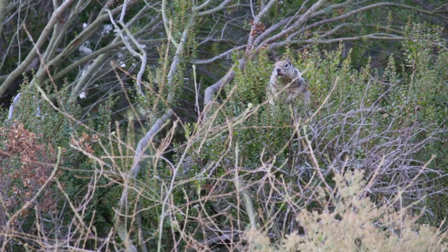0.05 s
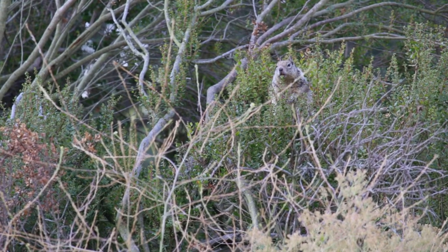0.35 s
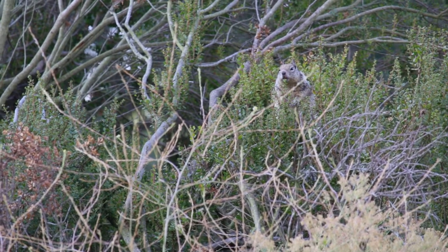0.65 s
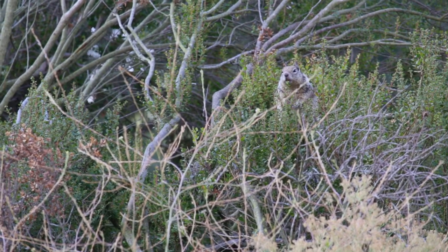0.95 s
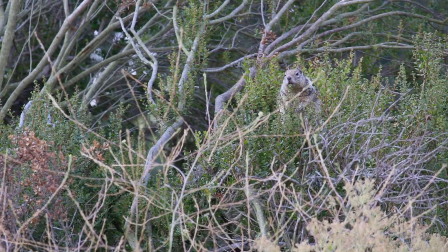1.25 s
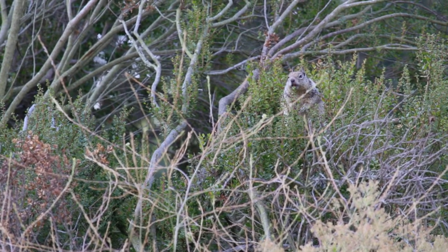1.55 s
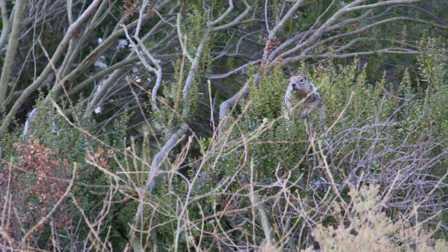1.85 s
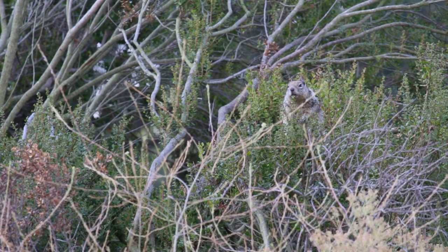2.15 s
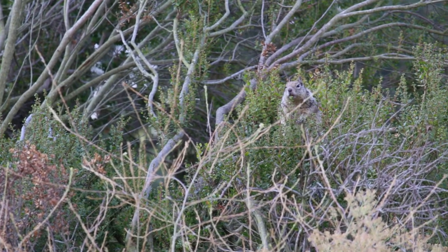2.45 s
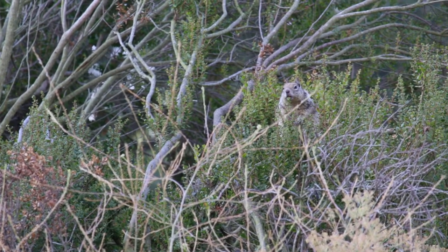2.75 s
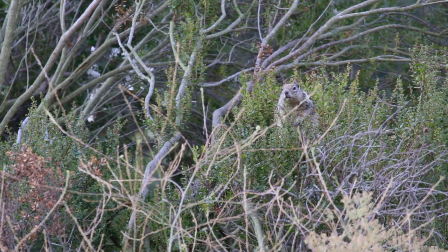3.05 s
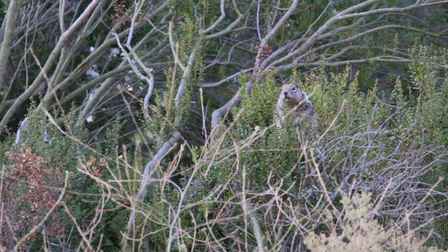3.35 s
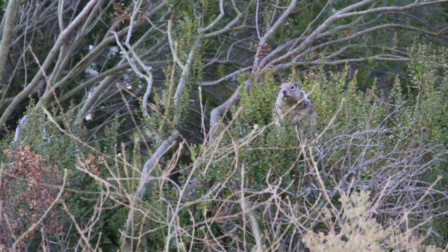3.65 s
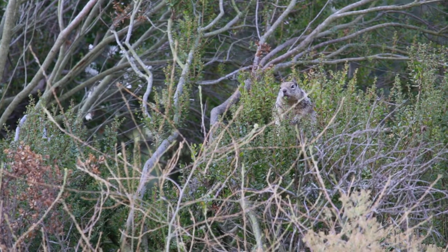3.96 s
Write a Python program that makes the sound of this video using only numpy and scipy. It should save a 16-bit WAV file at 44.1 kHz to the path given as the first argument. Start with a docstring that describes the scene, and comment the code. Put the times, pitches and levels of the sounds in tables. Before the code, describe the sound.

Outdoors among shrubs, faint birds chirp over a distant low rumble and light hiss. A ground squirrel lets out one loud, whistled alarm chirp, followed by a soft nasal bird mew and more far-off chirps and whistles.

```python
"""A distant low rumble runs throughout, swelling like a far aircraft, with a hollow, slowly sliding
resonance in it, over a faint hiss. Small birds chirp further off from the start, in short glides.
At 0.4 s a far, level whistle sounds. At 1.4 s a ground squirrel on a shrub gives one sharp whistled
alarm chirp, which scatters back from the brush. At 1.8 s a bird gives a nasal mew, its harmonics
sliding through a throat resonance. The far whistle returns at 1.9 and 3.5 s."""
import sys
import numpy as np
from scipy import signal
from scipy.fft import rfft, irfft
from scipy.io import wavfile

SR = 44100
rng = np.random.default_rng(int(sys.argv[2]) if len(sys.argv) > 2 else 0)


def int16_out(signal):
    """Quantize to a 16-bit WAV file."""
    q = np.round(np.clip(np.atleast_2d(signal).T, -1, 1) * 32767)
    wavfile.write(sys.argv[1], SR, q.astype(np.int16))


N = 176400

# rumble and hiss spectra: f/Hz, relative density/dB
RUMBLE_SPECTRUM = [(22, -16), (40, -8), (55, -2.5), (72, 2.5), (88, -1), (112, 1.2), (135, -3.5), (158, -8),
                   (190, -1), (225, 0), (270, -2), (330, -5), (420, -9.5), (580, -11.5), (690, -15),
                   (800, -21), (1000, -18.5), (1200, -28.5), (1410, -28.5), (1650, -32.5), (2000, -37),
                   (2800, -43)]
HISS_SPECTRUM = [(1650, -31), (2800, -2.5), (3370, 1), (3920, -2.5), (6380, -5), (10300, -8),
                 (15500, -13.5)]
# rumble swells in four ranges, low to high: t/s, relative level/dB
DEEP_SWELL = [(0, -46), (.15, -38), (.24, -38), (.36, -43.5), (.8, -41), (1.2, -42.5), (1.6, -41.5),
              (2.1, -42), (2.6, -37.5), (3.2, -41.5), (3.6, -41.5), (4, -38)]
LOW_SWELL = [(0, -46.5), (.4, -45.5), (.8, -40.5), (1.3, -40.5), (2.2, -40), (2.7, -35), (3.1, -37.5),
             (3.5, -35), (4, -39)]
BODY_SWELL = [(0, -35.5), (.4, -37.5), (1.0, -35), (1.6, -35), (2.1, -36), (2.35, -35), (2.41, -31.5),
              (2.46, -36.5), (3.0, -31), (3.4, -31.5), (3.7, -33), (4, -36.5)]
RUSH_SWELL = [(0, -43), (.8, -44.5), (1.3, -38.5), (1.72, -39.5), (1.9, -44), (2.4, -41), (2.85, -38.5),
              (3.2, -43), (3.65, -41), (4, -42)]
# top edge of each range: f/Hz
SWELL_TOPS_HZ = [88, 150, 390, 850]
# stereo width of rumble and hiss: f/Hz, side minus mid/dB
NOISE_WIDTH = [(60, -34), (130, -35.5), (290, -23), (640, -18.5), (1410, -10), (3100, 1.5), (6800, 1),
               (15000, -.5)]
# hollow resonance in the rumble: t/s, centre f/Hz, level/dB
RESONANCE_CONTOUR = [(0, 290, -40.5), (.4, 280, -43), (.82, 310, -41.5), (.86, 320, -29), (.93, 310, -42.5),
                     (1.15, 360, -47.5), (1.4, 345, -34), (1.6, 310, -35.5), (1.8, 280, -35),
                     (2.05, 290, -41.5), (3.15, 260, -42.5), (3.42, 255, -30), (3.55, 260, -35.5),
                     (4, 240, -44)]
# hiss: t/s, level/dB
HISS_ENVELOPE = [(0, -63.5), (.6, -64.5), (1.3, -64), (4, -64.5)]
# small birds: t/s, length/s, start f/Hz, middle f/Hz, end f/Hz, level/dB, echo/dB
BIRD_CHIRPS = [(0.059, 0.039, 3950, 4190, 4070, -52.5, -14), (0.2, .055, 3850, 4350, 4740, -59.5, -5),
               (0.324, 0.055, 4060, 4410, 4600, -56, -6), (0.449, .055, 3920, 4250, 4800, -58, -6),
               (.680, .065, 2870, 2980, 3000, -65, -6), (.945, 0.026, 3870, 3450, 3050, -64, -10),
               (1.634, 0.019, 3750, 3800, 3720, -59, -14), (1.937, 0.045, 8420, 7950, 7300, -51.5, -4),
               (2.066, 0.06, 7630, 7210, 7000, -52, -4.5), (2.180, .060, 7240, 6700, 6300, -65, 3),
               (2.218, .018, 6600, 5600, 4600, -57, -6), (2.31, .050, 6900, 6400, 5900, -68, 2),
               (2.680, .035, 3880, 3400, 3050, -64, -8)]
# far whistle: t/s, length/s, level/dB
WHISTLE_NOTES = [(0.393, 0.16, -60), (1.933, .15, -59.5), (3.533, 0.153, -58)]
# its harmonics 1-3: gain/dB
WHISTLE_PARTIALS_DB = [-27, 3, -13.5]
# squirrel's pitch: t/s, f/Hz
ALARM_CONTOUR = [(1.434, 3470), (1.444, 3484), (1.454, 3512), (1.466, 3541), (1.474, 3420), (1.486, 3400)]
# its harmonics 1-4: gain/dB, left minus right/dB, echo/dB
ALARM_PARTIALS = [(1, -3.5, 2), (-18.5, 2.5, 5), (-18.5, -1.5, 7), (-35, -2.5, 0)]
# mew: t/s, f/Hz, level/dB
MEW_CONTOUR = [(1.815, 586, -76), (1.835, 625, -61), (1.850, 747, -59), (1.860, 800, -52),
               (1.874, 900, -51), (1.881, 807, -53), (1.895, 710, -71)]
# its throat resonance: f/Hz, gain/dB
THROAT_RESPONSE = [(1500, -28), (2400, -12), (3200, -0.5), (3800, 0), (4400, 1.5), (4800, -24), (5600, -24)]


def from_db(db):
    """Decibels to gain."""
    return 10 ** (np.asarray(db) / 20)


def unit_rms(x):
    """Scale to rms 1."""
    return x / np.sqrt(np.mean(x ** 2) + 1e-20)


TIME_S = np.arange(N) / SR


def in_time(rows):
    """Each column of a curve at every sample."""
    times_s, *columns = np.transpose(rows)
    return [np.interp(TIME_S, times_s, column) for column in columns]


def at_hz(spectrum, hz):
    """Read a spectrum on a log-frequency axis."""
    points_hz, db = np.transpose(spectrum)
    return np.interp(np.log(hz), np.log(points_hz), db)


def drift(rate_hz):
    """Low-passed noise, rms 1."""
    pole = np.exp(-2 * np.pi * rate_hz / SR)
    return unit_rms(signal.lfilter([1], [1, -2 * pole, pole * pole], rng.standard_normal(N + SR))[SR:])


def butter(x, order, hz, kind):
    """Butterworth filter."""
    return signal.sosfilt(signal.butter(order, hz, kind, fs=SR, output="sos"), x)


def phase_of(hz):
    """Running phase of a pitch curve."""
    return 2 * np.pi * np.cumsum(hz) / SR


def voice(hz, harmonics_db):
    """Harmonics on a pitch curve, each of rms 1 at 0 dB."""
    phase = phase_of(hz)
    return np.sqrt(2) * sum(from_db(db) * np.sin(k * phase) for k, db in enumerate(harmonics_db, 1))


def pan(db):
    """Stereo gains for a left minus right level."""
    return from_db(np.array([[db], [-db]]) / 2)


def placed(x, pan_db, left_lead_s):
    """Direction as level and time differences between the ears."""
    left, right = np.broadcast_to(x, (2, N))
    delay = np.exp(-1j * np.pi * np.arange(N + 1) * SR / N * left_lead_s)
    return pan(pan_db) * np.array([left, irfft(rfft(right, 2 * N) * delay)[:N]])


def scatter(x, t60_s, loss_db_per_s=0, shared=0.2, build_s=0.0036):
    """Dense echoes from twigs and ground, partly shared by both ears."""
    t = TIME_S[:SR]
    decay = from_db(-60 * t / t60_s) * (1 - np.exp(-t / build_s))
    echoes = np.sqrt(shared) * rng.standard_normal(SR)
    echoes = echoes + np.sqrt(1 - shared) * rng.standard_normal((2, SR))
    echoes *= decay / np.linalg.norm(decay) * from_db(-loss_db_per_s * t)
    return signal.fftconvolve(x[None], echoes, axes=1)[:, :N]


def noise_bands(spectrum, edges_hz):
    """Yield centre Hz and stereo noise for each band."""
    white = rng.standard_normal((2, 2, N + SR // 2))
    for k, (low, high) in enumerate(zip(edges_hz, edges_hz[1:])):
        mid, side = butter(white[k % 2], 3, [low, high], "band")[:, -N:]
        hz = np.sqrt(low * high)
        stereo = mid + from_db(at_hz(NOISE_WIDTH, hz)) * side * [[1], [-1]]
        yield hz, from_db(at_hz(spectrum, hz)) * stereo


def distant_rumble(noise_db=-31, patchy_db=0.33, low_cut_hz=37):
    """Low noise swelling separately in four ranges under an even top, plus its resonance."""
    curves = (DEEP_SWELL, LOW_SWELL, BODY_SWELL, RUSH_SWELL)
    swells_db = [db - db.mean() for curve in curves for db in in_time(curve)] + [0]
    noise = 0
    for hz, band in noise_bands(RUMBLE_SPECTRUM, np.geomspace(22, 2800, 29)):
        lean_right = pan(-1.1 * min(hz / 1000, 1))
        swell_db = swells_db[np.searchsorted(SWELL_TOPS_HZ, hz)]
        noise += lean_right * band * from_db(swell_db + patchy_db * drift(7.3))
    noise = from_db(noise_db) * unit_rms(butter(noise, 2, low_cut_hz, "high"))
    return placed(noise + hollow_resonance(), pan_db=-0.2, left_lead_s=-70e-6)


def hollow_resonance(width_hz=28, hum_ratio=0.8):
    """A hum in a narrow noise band with a slowly sliding centre."""
    hz, db = in_time(RESONANCE_CONTOUR)
    phase = phase_of(hz)
    in_phase = (np.sqrt(2) * hum_ratio + drift(width_hz)) * np.cos(phase)
    quadrature = drift(width_hz) * np.sin(phase)
    return from_db(db) * unit_rms(in_phase + quadrature)


def hiss():
    """Faint, even hiss of open air."""
    db, = in_time(HISS_ENVELOPE)
    noise = sum(band for _, band in noise_bands(HISS_SPECTRUM, np.geomspace(2800, 17000, 9)))
    return from_db(db) * noise / noise.mean(axis=0).std()


def small_birds():
    """Short gliding whistles, some nearly dry, others blurred by the brush."""
    song, echo_send = np.zeros((2, N))
    waver = 1 + 0.014 * drift(234)
    for start_s, length_s, *glide_hz, db, echo_db in BIRD_CHIRPS:
        progress = np.clip((TIME_S - start_s) / length_s, 0, 1)
        hz = np.interp(progress, [0, 0.5, 1], glide_hz)
        note = from_db(db) * np.sqrt(np.abs(np.sin(np.pi * progress))) * voice(hz * waver, [0])
        song += note
        echo_send += from_db(echo_db) * note
    return placed(song + scatter(echo_send, t60_s=0.35), pan_db=5.5, left_lead_s=85e-6)


def far_whistle(pitch_hz=1932, drop_hz=65, settle_s=0.0252, ramp_s=0.008):
    """Slightly rough notes, second harmonic strongest, that settle in pitch and linger as echo."""
    song = np.zeros(N)
    waver = 1 + 0.016 * drift(149)
    for start_s, length_s, db in WHISTLE_NOTES:
        age_s = np.clip(TIME_S - start_s, 0, length_s)
        hz = pitch_hz + drop_hz * np.exp(-age_s / settle_s)
        gate = np.minimum(np.minimum(age_s, length_s - age_s) / ramp_s, 1)
        song += from_db(db) * gate * voice(hz * waver, WHISTLE_PARTIALS_DB)
    early = from_db(-2.5) * scatter(song, t60_s=0.019, shared=0.66)
    late = from_db(-3) * scatter(song, t60_s=1.0, shared=0.33)
    return placed(early + late, pan_db=1, left_lead_s=143e-6)


def squirrel(start_s=1.4338, end_s=1.47, attack_s=0.0026, release_s=0.0084,
             swell_db=3.5, swell_s=0.0037, loss_db_per_s_khz=9):
    """One abrupt, arched, nearly pure whistle; higher harmonics die sooner in the echoes."""
    hz, = in_time(ALARM_CONTOUR)
    age_s = np.maximum(TIME_S - start_s, 0)
    gate = np.minimum(age_s / attack_s, 1) * np.exp(-np.maximum(TIME_S - end_s, 0) / release_s)
    level_db = -27 - swell_db * np.exp(-age_s / swell_s)
    envelope = gate * from_db(level_db) * (1 + 0.018 * drift(400))
    phase = phase_of(hz * (1 + 0.00087 * drift(300)))
    air = butter(rng.standard_normal((2, N)), 2, [2500, 11000], "band")
    call = from_db(-41) * envelope * unit_rms(air)
    for k, (db, pan_db, echo_db) in enumerate(ALARM_PARTIALS, 1):
        tone = np.sqrt(2) * from_db(db) * envelope * np.sin(k * phase)
        loss = loss_db_per_s_khz * (k - 1) * hz.mean() / 1000
        brush = from_db(echo_db - 16) * scatter(tone, t60_s=0.19, loss_db_per_s=loss, build_s=0.0087)
        slope = from_db(echo_db - 20) * scatter(tone, t60_s=0.84, loss_db_per_s=loss, build_s=0.03)
        call += pan(pan_db) * (tone + brush + slope)
    return call


def mewing_bird(roughness=0.017, echo_db=-8):
    """A hoarse rise and fall; harmonics slide through a fixed throat resonance."""
    hz, db = in_time(MEW_CONTOUR)
    harmonics_db = [at_hz(THROAT_RESPONSE, k * hz) for k in range(1, 9)]
    gate = (TIME_S > MEW_CONTOUR[0][0]) & (TIME_S < MEW_CONTOUR[-1][0])
    call = from_db(db) * gate * voice(hz * (1 + roughness * drift(600)), harmonics_db)
    echo = from_db(echo_db) * scatter(call, t60_s=0.098, shared=0.21)
    return placed(call + echo, pan_db=1, left_lead_s=45e-6)


def scene():
    """Squirrel and birds over a distant rumble."""
    return squirrel() + small_birds() + mewing_bird() + far_whistle() + distant_rumble() + hiss()


def record(dry):
    """Steep low-pass at 15.7 kHz."""
    return signal.sosfilt(signal.ellip(12, 0.1, 90, 15700, fs=SR, output="sos"), dry)


dry = scene()
out = record(dry)
int16_out(out)
```